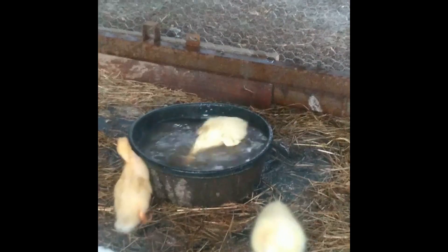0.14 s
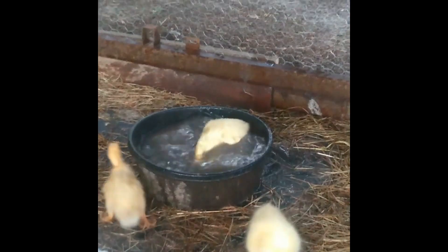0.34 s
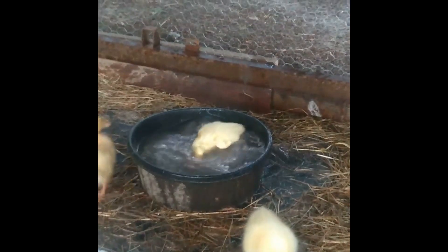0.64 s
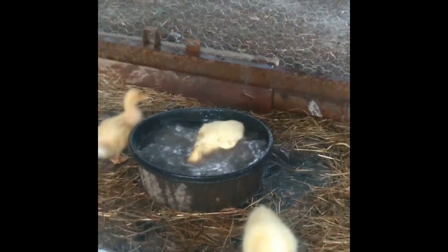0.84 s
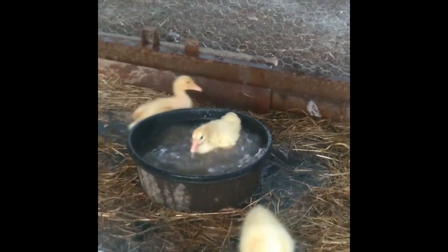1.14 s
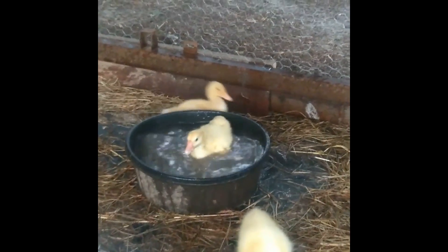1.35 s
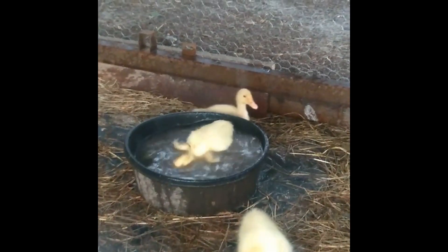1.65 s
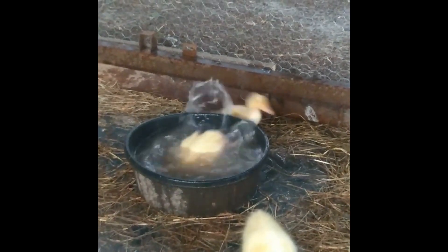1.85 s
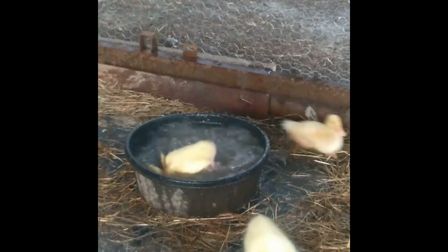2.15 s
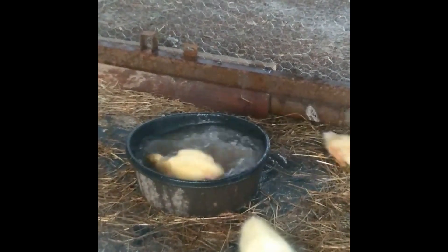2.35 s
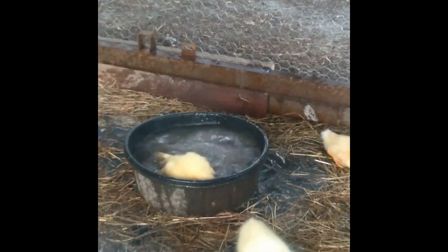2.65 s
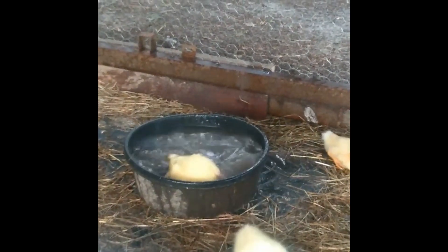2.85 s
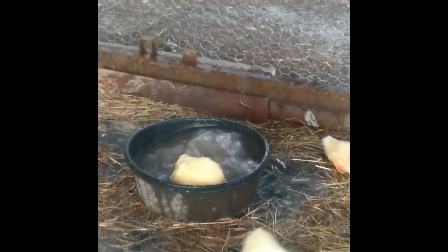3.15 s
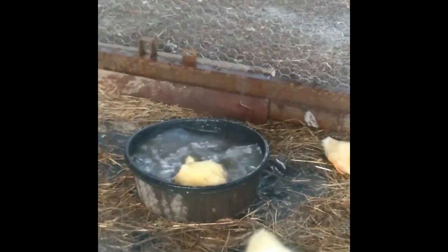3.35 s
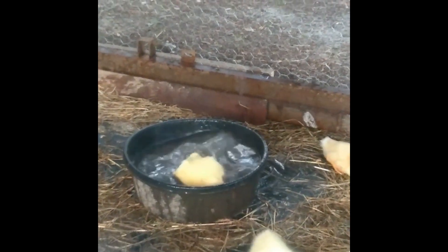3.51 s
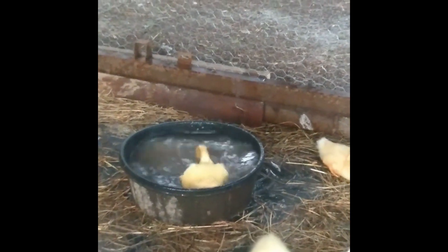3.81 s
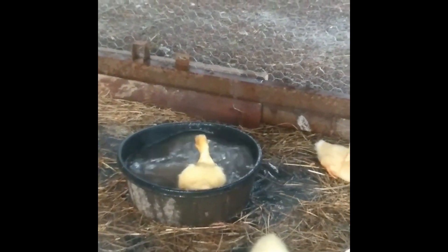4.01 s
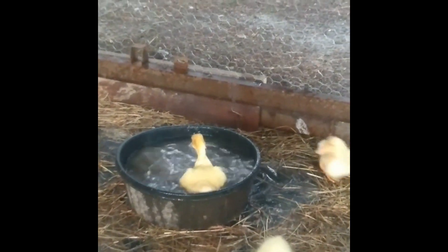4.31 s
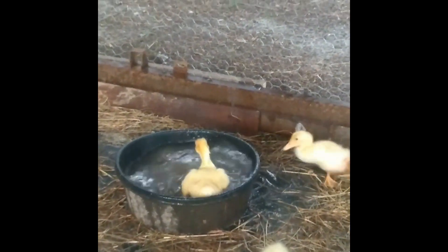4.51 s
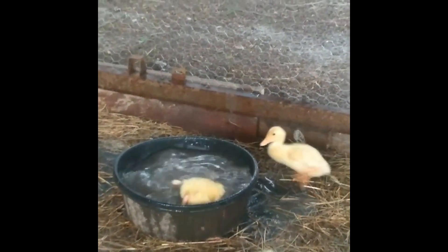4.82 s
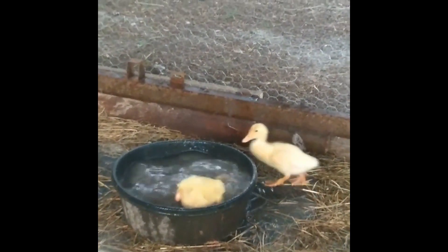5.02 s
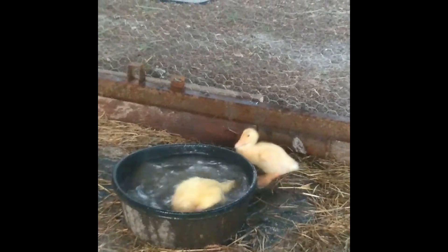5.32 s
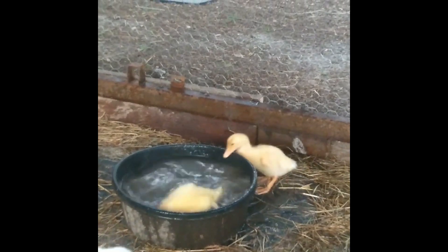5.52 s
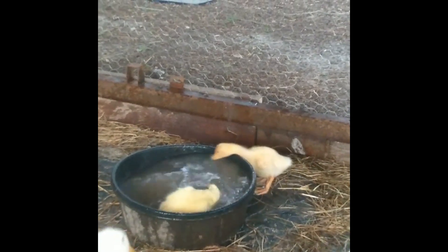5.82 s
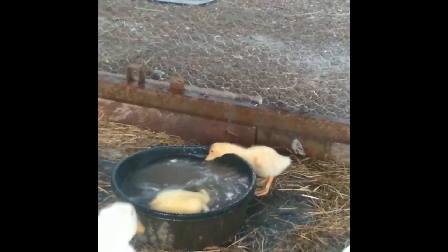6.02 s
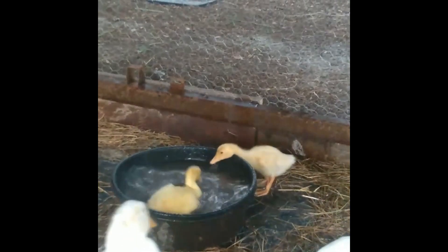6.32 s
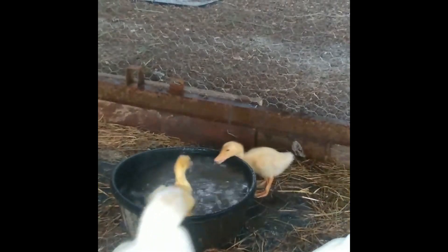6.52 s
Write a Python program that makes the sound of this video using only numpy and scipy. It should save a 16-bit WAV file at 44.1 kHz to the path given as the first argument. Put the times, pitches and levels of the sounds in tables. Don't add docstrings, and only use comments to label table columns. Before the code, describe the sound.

Near silence until about 0.4 s, then soft air hiss and a low fan hum fade in. Goslings peep from 0.5 s: high, slightly hoarse whistles, mostly falling, mixed with short soft chirps. Bubbly splashes come at 0.85-1.1 s and a smaller one at 1.4 s; keys jingle lightly around 1.3-1.6 s. The biggest splash runs 1.85-2.2 s, with crackling spray, plops and droplets. Loud peeps peak near 2.4 s. A small key jingle at 2.9 s, low bumps and hand groans around 3.2-3.7 s, and a faint wavering animal bleat at 3.25-3.9 s follow. Straw rustles and snaps; peeps continue until 5.3 s, with faint ones near 5.85 s. Close, loud boot thumps on a hollow board strike at 5.1, 5.55, 6.0 and 6.47 s, shuddering low, rattling, rebounding and jingling keys; the last is hardest. Small dry-sounding pen, handheld phone.

```python
import sys
import numpy as np
from scipy import signal
from scipy.fft import rfft, irfft
from scipy.io import wavfile
from scipy.ndimage import uniform_filter1d

SR = 44100
rng = np.random.default_rng(int(sys.argv[2]) if len(sys.argv) > 2 else 0)


def to_linear_factor(level_db):
    exponent = np.asarray(level_db, float) / 20
    return 10 ** exponent


def pcm_store(signal):
    levels = np.round(np.clip(np.atleast_2d(signal), -1, 1) * 32767)
    wavfile.write(sys.argv[1], SR, levels.astype(np.int16).T)


N = 293732
T = np.arange(N) / SR


def level(x, db):
    return x * to_linear_factor(db) / np.sqrt(np.mean(x ** 2) + 1e-30)


def colour(x, points):
    hz, db = np.transpose(points)
    f = np.arange(N // 2 + 1) * SR / N + 1
    return irfft(rfft(x) * to_linear_factor(np.interp(np.log(f), np.log(hz), db)), N)


def ring(x, hz, t60_s):
    pole = np.exp(2j * np.pi * hz / SR - np.log(1000) / (t60_s * SR))
    return signal.lfilter([1], [1, -pole], x).imag


def walk(rate_hz):
    k = int(SR / rate_hz)
    steps = np.repeat(rng.standard_normal(N // k + 1), k)
    return 1.87 * uniform_filter1d(uniform_filter1d(steps, k), k)[:N]


def dust(rate_hz, spread_db):
    clicks = rng.random(N) < rate_hz / SR
    size_db = spread_db * np.minimum(rng.exponential(size=N), 4)
    return clicks * to_linear_factor(size_db) * rng.standard_normal(N)


def add(out, s, grain):
    i = int(s * SR)
    out[..., i:i + grain.shape[-1]] += grain[..., :N - i]


def bursts(times, dbs, t60_s, rise_s):
    power, t = np.zeros(N), T[:int(1.5 * t60_s * SR)]
    for s, db, up in np.broadcast(times, dbs, rise_s):
        add(power, s - up / 2, (to_linear_factor(db - 60 * t / t60_s) * np.minimum(t / up, 1)) ** 2)
    return np.sqrt(power)


def patchy(x, slow_db, quick_db):
    f = np.log2(np.arange(N // 2 + 1) * SR / N + 1) * 2
    spectrum, out = rfft(x), 0
    for k in range(20, 29):
        lowest = k - 99 * (k == 20)
        weight = np.clip(1 - np.abs(f - np.clip(f, lowest, k)), 0, 1)
        out = out + irfft(spectrum * weight, N) * to_linear_factor(slow_db * walk(5) + quick_db * walk(25))
    return out


def place(x, pan_db=0., lag=7, wet_db=-10., t60_s=0.16):
    t = T[:int(.4 * SR)]
    tail = rng.standard_normal((2, len(t))) * to_linear_factor(-60 * t / t60_s) * (t > .004)
    tail = tail * to_linear_factor(wet_db) / np.sqrt(np.sum(tail ** 2, axis=1, keepdims=True))
    tail[1] += uniform_filter1d(tail[0] - tail[1], size=36)
    direct = np.array([np.roll(x, lag) * to_linear_factor(pan_db / 2), x * to_linear_factor(-pan_db / 2)])
    return direct + signal.fftconvolve(x[None], tail, axes=1)[:, :N]


def bubble(hz, end_ratio, length_s):
    t = T[:int(3 * length_s * SR) + 8] / length_s
    glide = t + (end_ratio - 1) * t ** 2 / 2
    return np.sin(2 * np.pi * hz * length_s * glide) * np.exp(-2 * t) * np.minimum(5 * t, 1)


# (frequency [Hz], density [dB per Hz])
HISS_SPECTRUM = [(15, -44), (25, -14), (185, -14), (256, -22.5), (394, -25), (516, -21), (714, -18),
                 (1100, -17.5), (1480, -28), (6050, -32.5), (11600, -36), (14400, -28), (16000, -60)]


def air_hiss():
    mid, side = rng.standard_normal((2, N))
    side = colour(side, [(100, -6.0), (400, -9.5), (1200, -3.0), (16000, 2.5)])
    hiss = level(colour(mid + side * [[1], [-1]], HISS_SPECTRUM), -53.5)
    return patchy(hiss, 1.2, 1.8) * to_linear_factor(.6 * walk(3) - .5)


# (frequency [Hz], width [Hz], level [dB])
FAN_BANDS = [
    (125, 9, -65),
    (167, 40, -83),
    (75.8, 8.2, -67),
]


def fan():
    hum = sum(level(ring(rng.standard_normal(N), hz, 7.9 / width), db) for hz, width, db in FAN_BANDS)
    blade_hz, _, blade_db = FAN_BANDS[0]
    phase = 2 * np.pi * np.cumsum(blade_hz + 1.52 * walk(1.3)) / SR
    return hum + to_linear_factor(blade_db + 2.0) * np.sin(phase)


# (time [s], ground bump [dB], groan of hand on phone [dB])
STEP_EVENTS = [(.56, -78, -43), (0.628, -79, -39.5), (0.846, -38.5, -47), (.91, -61, -43),
               (1.04, -43.5, -40), (1.15, -51, -41.5), (1.44, -58, -59), (1.6, -65, -69), (1.92, -61, -62),
               (2.98, -88, -48), (3.237, -46.5, -64), (3.31, -49, -74), (3.524, -42, -33.5),
               (3.59, -51, -65), (3.695, -40, -65), (3.93, -66, -51), (4.69, -70, -53), (5.051, -71, -60)]


def steps():
    s, bump_db, groan_db = np.transpose(STEP_EVENTS)
    rise_s, bump_t60_s, groan_t60_s = 0.015, 0.56, 0.61
    bump_points = [(60, -32), (130, 0.5), (220, 3.0), (380, -7.5), (700, -16.0), (2000, -88)]
    groan_points = [(20, -22), (45, -23.0), (90, 3.5), (160, 2.5), (400, -105)]
    bump = level(colour(rng.standard_normal(N), bump_points), 5.8)
    groan = level(colour(rng.standard_normal(N), groan_points), -0.33)
    return bump * bursts(s, bump_db, bump_t60_s, rise_s) + groan * bursts(s, groan_db, groan_t60_s, rise_s)


# (time [s], level [dB])
SHUFFLE_LEVEL = [(0.45, -129), (0.62, -64), (1.44, -58), (1.89, -67), (2.08, -50), (2.32, -52), (2.68, -67),
                 (3.34, -57), (3.64, -71), (4.18, -89), (4.58, -57), (5.31, -48), (6.05, -63), (6.17, -30),
                 (6.51, -54), (6.6, -43)]


def straw():
    crackle = np.array([dust(900 * to_linear_factor(4 * walk(12)), 2) for _ in range(2)])
    stalk = rng.standard_normal((1, 300)) * np.exp(-np.arange(300) / 190.0)
    crackle = signal.fftconvolve(crackle, stalk, axes=1)[:, :N]
    crackle = crackle + 0.37 * crackle[::-1]
    crackle = colour(crackle, [(900, -14), (2500, -3.0), (5000, -3.5), (10000, -2.5), (15000, -29)])
    s, db = np.transpose(SHUFFLE_LEVEL)
    busy_db = np.minimum(np.interp(T, s, db), -62)
    return patchy(level(crackle, 5.7), 2.2, 1.5) * to_linear_factor(busy_db)


# (time [s], pitch [Hz], level [dB])
CALL_CONTOUR = [
    (3.25, 480.0, -71),
    (3.56, 575.1, -65),
    (3.654, 537.1, -70),
    (3.9, 579.3, -66),
]


def far_call():
    s, hz, db = np.transpose(CALL_CONTOUR)
    gate = np.clip(np.minimum(T - s[0], s[-1] - T) / 0.059, 0, 1)
    hz, db = np.interp(T, s, hz), np.interp(T, s, db)
    phase = 2 * np.pi * np.cumsum(hz * (1 + .012 * walk(60))) / SR
    bleat = np.sin(phase) + to_linear_factor(0.5) * np.sin(2 * phase) + to_linear_factor(-12.5) * np.sin(3 * phase)
    return place(gate * to_linear_factor(db - 3 + 3 * walk(25)) * bleat, wet_db=3.)


def settle_then_drop(u, length_s):
    settle, sag, settle_s = .31, .18, .06
    return settle * np.tanh((u * length_s / settle_s) ** 1.48) + sag * u + (1 - settle - sag) * u ** 8


def roll_over(u, length_s):
    return u ** (.33 / length_s)


def level_off(u, length_s):
    return (1 - np.cos(np.pi * u ** .75)) / 2


def arch(u, length_s):
    return np.sin(np.pi * u ** 1.6)


def swell(u, length_s):
    share, swell_s, release_s = .35, .04, .012
    rise = np.sin(np.pi / 2 * np.minimum(u / min(share, swell_s / length_s), 1)) ** 2
    return np.clip(np.minimum(rise, (1 - u) * length_s / release_s), 0, 1)


# (start [s], length [s], first pitch [Hz], last pitch [Hz], level [dB])
HELD_PEEPS = [
    (0.631, 0.18, 4804, 2483, -46),
    (1.362, .185, 4830, 2448, -48.5),
    (2.1, 0.25, 4957, 2560, -42),
    (4.875, .21, 4526, 2760, -52.5),
    (5.853, 0.17, 4545, 3195, -50),
]
# (start [s], length [s], first pitch [Hz], last pitch [Hz], level [dB])
ROLLED_PEEPS = [
    (1.746, 0.099, 5250, 3500, -61),
    (2.428, 0.13, 4875, 2450, -37.5),
    (3.049, 0.19, 4710, 2750, -46),
    (3.392, 0.12, 4710, 2330, -45),
    (2.548, .11, 4870, 2670, -45.5),
    (4.506, 0.11, 5660, 3800, -61),
    (4.736, .112, 6010, 3530, -53.5),
    (4.752, 0.058, 7000, 6800, -50),
    (5.21, 0.13, 4810, 2250, -38.5),
]
# (start [s], length [s], first pitch [Hz], last pitch [Hz], level [dB])
SHORT_SLIDES = [(0.704, 0.093, 3580, 3060, -58), (0.857, 0.062, 4670, 3770, -50),
                (0.879, .1, 3680, 3010, -49), (1.09, 0.028, 4340, 4000, -53),
                (1.113, 0.041, 3380, 2980, -44.5), (1.115, 0.033, 7800, 6240, -51),
                (4.193, 0.052, 3700, 3450, -67), (4.5, 0.048, 6870, 6800, -56.5),
                (1.604, 0.086, 4980, 3000, -50), (1.608, 0.04, 3500, 3040, -54),
                (1.822, 0.072, 3650, 2940, -43), (2.015, 0.085, 4380, 2875, -42.5),
                (2.384, 0.074, 4850, 3150, -42), (4.027, 0.044, 3600, 3470, -71),
                (3.99, 0.036, 3230, 3370, -70), (2.887, 0.089, 3950, 2875, -46.5),
                (3.072, 0.051, 3740, 2860, -61), (3.125, 0.073, 4300, 2950, -50),
                (3.218, 0.099, 4760, 4130, -60), (3.353, 0.048, 3700, 2870, -53.5),
                (3.815, 0.096, 4165, 2730, -51.5), (4.352, 0.081, 4770, 4320, -68),
                (4.836, 0.055, 3850, 2970, -46.5)]
# (start [s], length [s], first pitch [Hz], top pitch [Hz], level [dB])
CONTACT_CHIRPS = [(0.54, 0.051, 2300, 2544, -57), (1.095, 0.035, 2450, 2720, -43.5),
                  (2.425, 0.024, 2900, 3260, -40.5), (4.053, 0.033, 4200, 4600, -69),
                  (1.287, 0.078, 1910, 2245, -51), (1.468, 0.052, 2320, 2690, -50),
                  (1.565, 0.036, 2300, 2330, -51.5), (1.707, 0.086, 920, 1265, -45),
                  (2.132, 0.025, 2350, 2500, -53), (2.593, 0.059, 2730, 2950, -55),
                  (2.727, 0.075, 2770, 2970, -57), (3.834, 0.034, 2230, 2460, -51),
                  (3.914, 0.085, 2150, 2810, -60), (4.153, 0.086, 1740, 2834, -49),
                  (4.539, 0.075, 1830, 2550, -54.5), (4.629, 0.085, 1680, 2720, -45),
                  (4.992, 0.086, 1920, 2280, -57), (5.841, 0.065, 2840, 2980, -53.5)]


def goslings():
    kinds = [  # calls, glide, pan [dB], pitch roughness, octave [dB]
        (HELD_PEEPS, settle_then_drop, 1, .006, -28),
        (ROLLED_PEEPS, roll_over, 3, .009, -27),
        (SHORT_SLIDES, level_off, 3, .014, -23),
        (CONTACT_CHIRPS, arch, 2, .045, -22)]
    out, waver, flutter = 0, walk(440), walk(110)
    for calls, glide, pan_db, rough, octave_db in kinds:
        voice = np.zeros(N)
        for s, length_s, first_hz, last_hz, db in calls:
            u = T[:int(length_s * SR)] / length_s
            here = slice(int(s * SR), int(s * SR) + len(u))
            hz = first_hz + (last_hz - first_hz) * glide(u, length_s)
            phase = 2 * np.pi * np.cumsum(hz * (1 + rough * waver[here])) / SR
            throat_db = -8.5 * np.abs(np.log2(hz / 4000))
            gain = to_linear_factor(db + 1 + throat_db + 5 * np.tanh(flutter[here]))
            overtones = np.sin(2 * phase) + .2 * np.sin(3 * phase)
            whistle = np.sin(phase) + to_linear_factor(octave_db + 4 * waver[here]) * overtones
            voice[here] += swell(u, length_s) * gain * whistle
        voice = voice + .5 * np.roll(voice, int(.0042 * SR)) + .2 * np.roll(voice, int(.011 * SR))
        out = out + place(voice, pan_db, lag=2, wet_db=-10., t60_s=.12)
    return out


# (time [s], slosh [dB], spray [dB])
KICKS = [(0.844, -28, -42), (0.879, -20.5, -54), (0.894, -30, -56), (1.021, -23, -35), (1.047, -38, -26.5),
         (1.07, -20.5, -55), (1.129, -31, -33.5), (1.426, -34.5, -28), (1.714, -64, -54),
         (1.857, -33, -34.5), (1.888, -24.5, -20), (1.919, -25, -17), (1.955, -27.5, -12),
         (1.982, -23.5, -44), (2.047, -25.5, -39), (2.083, -27, -19), (2.117, -30.5, -38),
         (2.165, -36, -19), (2.209, -37, -48), (2.293, -56, -34), (2.36, -64, -44), (2.43, -65, -42),
         (2.64, -66, -46)]
# (time [s], peak [dB], pitch [Hz], end pitch ratio, length [s])
LARGE_BUBBLES = [(0.895, -24.5, 1193, 1, 0.023), (1.029, -35, 1170, 0.5, 0.017),
                 (1.035, -29.5, 1910, 0.88, 0.022), (1.087, -33, 763, 0.92, 0.023),
                 (1.917, -22, 1128, 1.27, 0.018), (1.979, -27, 1255, 1.04, 0.028),
                 (2.047, -31, 937, 1.08, 0.019), (2.087, -29, 1830, 0.92, 0.0089),
                 (6.422, -33.5, 1856, 1.03, 0.023), (4.9905, -13, 4200, 0.87, 0.0032),
                 (6.27, -38, 1080, 1.1, 0.023), (1.859, -36.5, 1930, 0.78, 0.038),
                 (1.884, -30, 1875, 0.99, 0.022), (1.905, -30.5, 840, 1.14, 0.014),
                 (2.021, -28.5, 1750, 1.1, 0.013), (2.076, -31.5, 1055, 1.05, 0.012),
                 (.851, -31.5, 794, 1.15, 0.011), (.887, -28, 1495, 1.1, 0.014),
                 (.905, -27.5, 1890, 0.6, 0.0076), (1.048, -27.5, 2050, 1.05, 0.026),
                 (1.096, -26, 1500, 1.1, 0.0054), (2.15, -40, 1200, 0.85, 0.019),
                 (0.8744, -34, 1830, 1, 0.041), (1.067, -18.5, 1910, .75, .018)]


def splashes():
    swarm = 0
    for hz in 500 * 1.25 ** np.arange(12):
        bubbles = signal.fftconvolve(dust(220, 1.2), bubble(hz, 1.265, 6.6 / hz))[:N]
        swarm = swarm + bubbles * (hz / 1000) ** 0.65
    grain = rng.standard_normal(60) * np.exp(-np.arange(60) / 15)
    spray = signal.fftconvolve(dust(2400, 1.5) * to_linear_factor(4 * walk(70)), grain)[:N]
    spray = colour(spray, [(700, -30), (1500, -4), (4000, -1), (9000, -7), (12000, -13), (16000, -16)])
    s, slosh_db, spray_db = np.transpose(KICKS)
    slosh = level(swarm, -6) * bursts(s, slosh_db - 8.5, 0.24, 0.018)
    spray = patchy(level(spray, -4), 0, 2.5) * bursts(s, spray_db - 11.5, 0.26, 0.017)
    plops = np.zeros(N)
    for s, db, hz, end_ratio, length_s in LARGE_BUBBLES:
        add(plops, s, to_linear_factor(db - 4.5) * bubble(hz, end_ratio, length_s))
    return place(slosh + spray + plops, -3., lag=5, wet_db=-10., t60_s=.12)


# (time [s], peak [dB], pitch [Hz])
TUB_THUDS = [
    (1.446, -49.5, 320),
    (1.594, -52, 324),
    (2.489, -55, 322),
    (2.676, -58, 232),
    (2.742, -52.5, 305),
    (4.167, -52, 308),
    (4.395, -55.5, 303),
    (4.749, -53.5, 312),
    (4.831, -50.5, 264),
]
# (time
# [s], peak [dB], pitch [Hz])
SMALL_TICKS = [(0.745, -36, 3520), (0.847, -33.5, 6300), (1.0286, -39, 6500), (1.71, -34.5, 7340),
               (1.803, -41, 6460), (0.854, -41, 6460), (0.896, -38, 6540), (0.91, -34, 2520),
               (1.092, -42, 2600), (1.098, -47, 3000), (2.294, -26, 4500), (1.859, -43, 3200),
               (2.55, -42, 5250), (2.658, -43.5, 6640),
               (1.8344, -40, 3420), (1.8577, -37, 3300), (1.888, -25, 4700), (1.9035, -20, 3330),
                    (1.9205, -16, 4250), (1.9342, -16.5, 4070), (2.0516, -36, 3270), (2.052, -21.5, 3630),
                    (2.0905, -28, 4500), (2.1172, -15, 4400), (2.1574, -23.5, 4380), (2.272, -34, 4000),
               (0.613, -43.5, 9900), (2.808, -47.5, 12000), (3.3244, -36.5, 9800), (6.334, -28, 2360),
               (5.775, -37, 10900), (3.66, -71, 14000), (3.7, -64, 9000), (3.978, -54, 12100),
               (4.149, -43.5, 7950), (4.395, -47, 9000), (4.637, -43, 11000), (4.905, -46, 11000),
               (6.144, -19.5, 4000), (6.189, -25, 4000), (3.8753, -42, 2930), (4.1577, -36, 4200),
               (4.314, -39.5, 9500), (4.455, -36.5, 7000), (4.662, -21, 10800), (4.681, -23.5, 5640),
               (4.8353, -37, 3820), (4.9905, -24, 4130), (5.0726, -27, 6960), (5.438, -21.5, 7450),
               (5.528, -32, 8100), (5.536, -23.5, 6960), (6.453, -22, 8000), (5.7184, -28, 10100),
               (5.99, -40, 4240), (6.269, -31, 8600), (6.3312, -25.5, 8300)]


def small_impacts():
    hits = np.zeros((2, N))
    for s, db, hz in TUB_THUDS:
        add(hits, s, to_linear_factor(db) * bubble(hz, 0.93, 0.016))
    n = np.arange(500)
    for s, db, hz in SMALL_TICKS:
        uneven = to_linear_factor(1.66 * np.repeat(rng.standard_normal(10), 50))
        snap = rng.standard_normal((2, 500)) * np.exp(-n / 211.0) * np.minimum(n / 84.0, 1) * uneven
        snap = np.diff(snap + 0.89 * snap[0], prepend=0)
        ping = np.resize(np.r_[bubble(hz, 1.05, .0012), np.zeros(500)], 500)
        port_db = np.array([[-3.5], [3.5]])
        add(hits, s, to_linear_factor(db - 5.0 + port_db) * (0.34 * snap + ping))
    return hits + place(hits.mean(axis=0), wet_db=20., t60_s=.09) * .06


# (time [s], crash [dB], thump re crash [dB], keys re crash [dB], rise [s])
BOOT_BLOWS = [
    (5.0917, -14.5, 3.5, 3, 0.034),
    (5.1474, -28.5, 7.5, -31, 0.0029),
    (5.546, -13, 2, -7.5, 0.016),
    (5.613, -24.5, 8.5, -28, 0.0094),
    (6.0115, -15, 6, -7, 0.015),
    (6.084, -18, 1.5, -2, 0.031),
    (6.473, -10.5, 2.5, -8, 0.028),
    (6.5294, -24, -1, -20, 0.022),
]


def blow_shape(part, t60_s):
    s, crash_db, thump_db, keys_db, rise_s = np.transpose(BOOT_BLOWS)
    part_db = {"crash": 0, "thump": thump_db, "keys": keys_db}[part]
    return bursts(s, crash_db + part_db, t60_s, rise_s)


# (time [s], level [dB], tilt [dB per octave])
KEY_JOLTS = [(0.453, -66.5, 6.2), (0.5394, -67, 3.7), (1.281, -42.5, 0.72), (1.32, -37.5, 1.4),
             (1.408, -41.5, 0.69), (1.566, -46, 1.3), (1.593, -50, 0.92), (2.176, -42, 2.7),
             (2.866, -57.5, 1.9), (2.913, -39.5, 8.3), (3.266, -49.5, 2.4)]
# (frequency [Hz], level [dB], t60 [s])
KEY_MODES = [(4093, -3, .18), (4320, -14, .12), (5875, -11, .25), (6263, -12, .25), (6745, -13, .25),
             (6944, 3, .2), (7687, -6, .22), (8166, -9, .3), (9015, -15, .3), (9260, -12, .25),
             (9410, -7, .3), (9870, -14, .3), (10430, -14, .25), (10600, -14, .22), (10970, -25, .2),
             (12390, -22, .15)]
# (time [s], peak [dB], pitch [Hz], ring [s])
KEY_CLINKS = [(5.093, -22, 6944, .078), (5.097, -31, 9015, .055), (5.14, -36, 8166, .074),
              (2.916, -45, 9410, .07), (2.918, -54, 10550, .11), (5.585, -30, 6944, .07),
              (5.605, -32, 8166, .05), (5.62, -38, 12000, .034), (5.68, -42, 8166, .05),
              (5.57, -36, 9870, .1), (5.58, -39, 10970, .09), (6.03, -29, 6944, .085),
              (6.13, -38, 8166, .067), (6.16, -42, 5875, .034), (6.05, -37, 9870, .16),
              (6.11, -40, 9015, .08), (6.04, -39, 10970, .12), (6.49, -35, 9260, .065),
              (6.51, -32, 6944, .055), (6.53, -39, 6263, .09), (6.58, -36, 6944, .07),
              (6.62, -43, 9410, .04), (6.6, -40, 10970, .06), (1.278, -51, 4093, .12),
              (1.4, -47, 4093, .06), (1.59, -46, 5875, .13), (1.325, -48, 9410, .07),
              (1.41, -49, 9410, .09), (1.325, -49, 10600, .08), (1.29, -46, 6944, .08),
              (1.41, -47, 6944, .05), (1.41, -51, 5875, .1), (1.29, -53, 5875, .1), (2.185, -45, 5875, .04),
              (2.18, -47, 10600, .06), (2.17, -50, 9410, .11)]


def keys():
    s, db, tilt_db = np.transpose(KEY_JOLTS)
    blow_tilt_db = 3
    tilt_db = np.interp(T, [*s, BOOT_BLOWS[0][0]], [*tilt_db, blow_tilt_db])
    jolts = blow_shape("keys", 0.2) + to_linear_factor(3.0) * bursts(s, db, 0.18, 0.0077)
    knocks = level(dust(3000, 1.), -12) * jolts
    out = to_linear_factor(-15) * np.diff(knocks, prepend=0)
    for hz, db, t60_s in KEY_MODES:
        drive = knocks * rng.standard_normal(N) * to_linear_factor(2.5 * walk(15))
        out = out + to_linear_factor(db - 21 + tilt_db * np.log2(hz / 7000)) * ring(drive, hz, .6 * t60_s)
    for s, db, hz, ring_s in KEY_CLINKS:
        t = T[:int(ring_s * SR)]
        gate = np.clip(np.minimum(t / 0.0031, (ring_s - t) / 0.0074), 0, 1)
        pair = np.sin(2 * np.pi * hz * t) + .35 * np.sin(2 * np.pi * (hz + 38) * t)
        add(out, s, to_linear_factor(db - 9 * t / ring_s) * gate * pair)
    return place(out, -9.5, lag=2, wet_db=-7.5, t60_s=0.31)


# (frequency [Hz], width [Hz], level [dB])
BOARD_MODES = [
    (65, 78, -28),
    (94, 5.7, -17),
    (137.6, 18.5, -5),
    (193.4, 19.7, -2.5),
    (263.8, 10.5, -3.5),
    (325.2, 31, -9.5),
    (560, 26, -21.5),
]


def board(x):
    out = 0
    for k, (hz, width_hz, db) in enumerate(BOARD_MODES):
        out = out + (-1) ** k * to_linear_factor(db) * width_hz * ring(x, hz, 1.36 / width_hz)
    return out


# (frequency [Hz], density [dB per Hz])
CRASH_SPECTRUM = [(70, 18), (240, 1.5), (400, 1), (636, -5.5), (708, -2), (826, -4.5), (2250, -1),
                  (5600, -4), (6950, -3), (7280, -5), (10500, -1.5), (12000, -16.5), (16000, -2)]
# (frequency [Hz], level [dB], t60 [s])
SLAT_MODES = [
    (1900, -4, .012),
    (2337, -5, .015),
    (2518, -3, .018),
    (3500, -6, .01),
    (4450, -6, .01),
]


def boot():
    push = blow_shape("thump", 0.35) + to_linear_factor(-12.0) * blow_shape("thump", 0.66)
    shudder = level(board(rng.standard_normal(N)), -11.5) * push
    strike = to_linear_factor(-56.0) * board(np.maximum(np.diff(push, prepend=0), 0))
    boom = level(ring(rng.standard_normal(N), 98, 0.07), -33.5)
    boom = boom * blow_shape("thump", 0.84)
    slats = 0
    for hz in 500 * 1.416 ** np.arange(12):
        drive = rng.standard_normal((2, N)) + .5 * np.array([dust(1300, 9.0), dust(810, 2.7)])
        slats = slats + level(ring(drive, hz, 7 / hz), 4.02 * walk(45)) * np.sqrt(hz)
    crash = blow_shape("crash", 0.2) + to_linear_factor(-17.5) * blow_shape("crash", 0.89)
    rattle, wide = level(colour(slats, CRASH_SPECTRUM), -5.0) * crash
    wood = sum(to_linear_factor(db) * ring(dust(1500, 1.5), hz, t60_s) for hz, db, t60_s in SLAT_MODES)
    wood = level(wood, 2.46) * blow_shape("crash", 0.079)
    low = place(shudder + strike + boom, lag=0, wet_db=-6.0)
    high = place(rattle + wood, -9.0, lag=7, wet_db=1.0, t60_s=.25)
    wide = 0.41 * colour(wide, [(300, -39), (1200, -2.0), (12000, 6.5)]) * [[1], [-1]]
    return low + high + wide


# (time [s], level [dB])
FADE_IN = [
    (.39, -39),
    (.45, -23.5),
    (.55, -15.5),
    (.68, -13),
]


def scene():
    s, db = np.transpose(FADE_IN)
    background = air_hiss() + fan() + steps() + straw()
    background = background * to_linear_factor(np.interp(T, s, db, left=-200))
    return background + far_call() + goslings() + splashes() + small_impacts() + keys() + boot()


def roll_off(x):
    return signal.sosfilt(signal.butter(12, 16100, fs=SR, output="sos"), x)


def record(dry):
    mix = signal.sosfilt(signal.butter(4, 52, "highpass", fs=SR, output="sos"), dry)
    mix = signal.sosfilt(signal.butter(4, 13000, fs=SR, output="sos"), mix)
    mix = np.tanh(1.3 * mix) / 1.3
    mix = signal.sosfilt(signal.ellip(8, .2, 60, 15900, fs=SR, output="sos"), mix)
    return roll_off(mix)


dry = scene()
out = record(dry)
pcm_store(out)
```